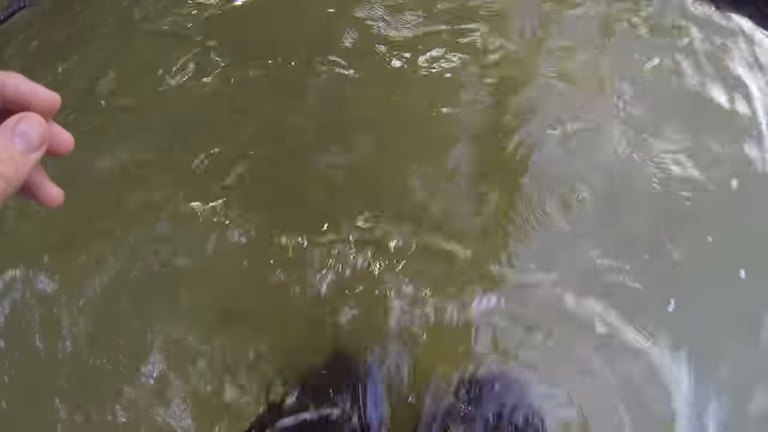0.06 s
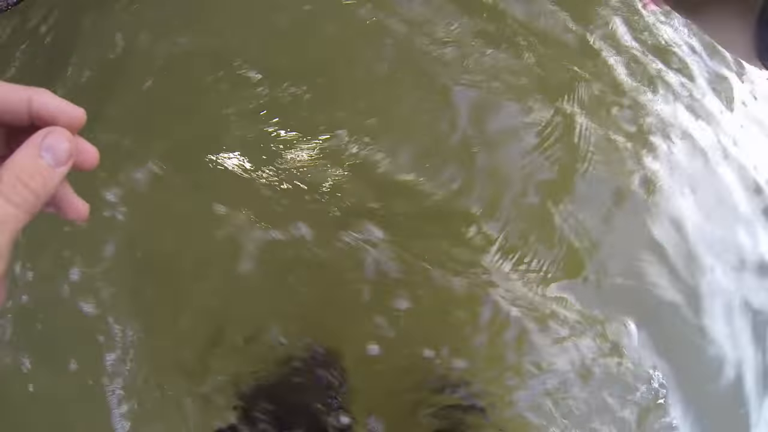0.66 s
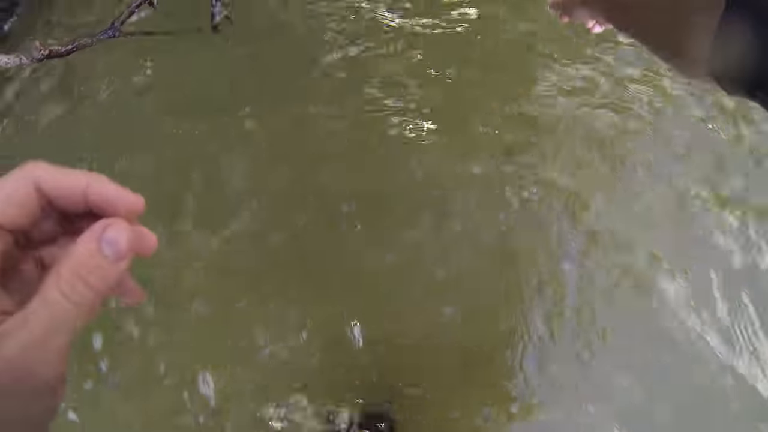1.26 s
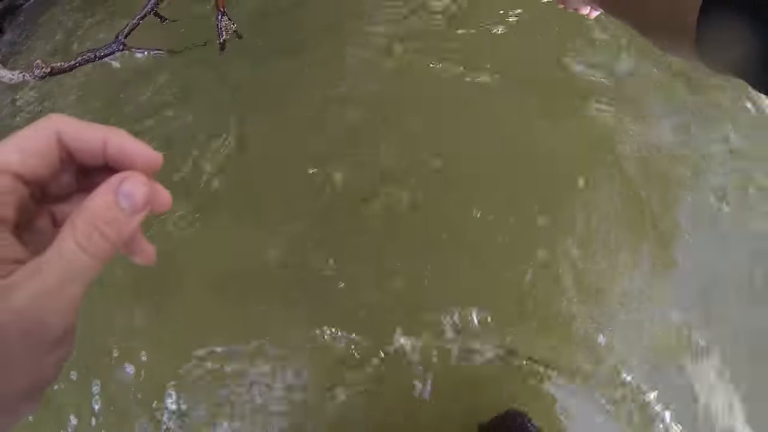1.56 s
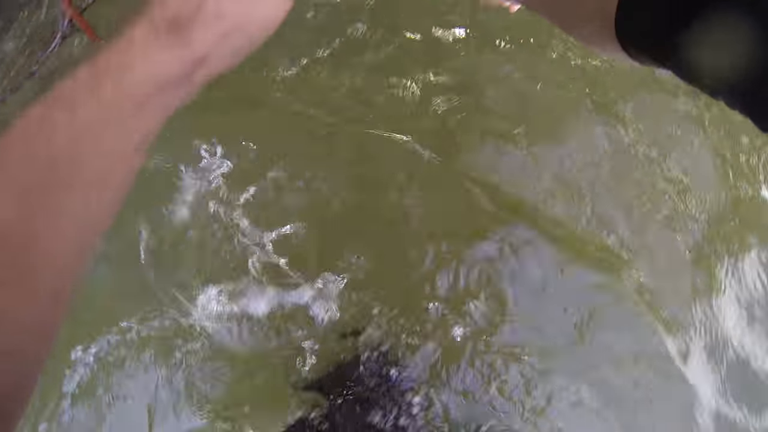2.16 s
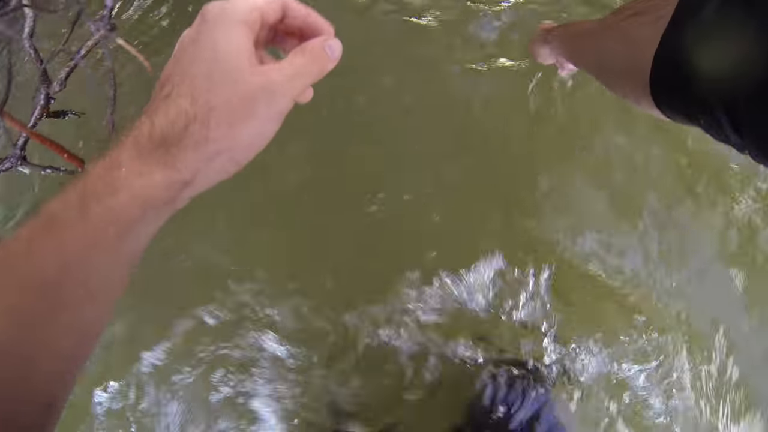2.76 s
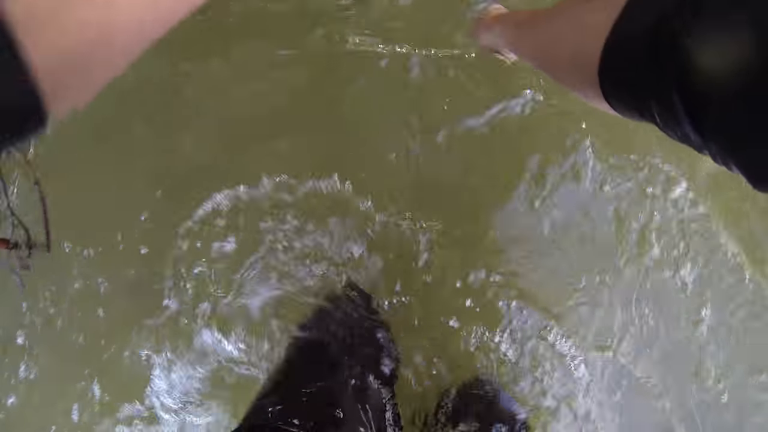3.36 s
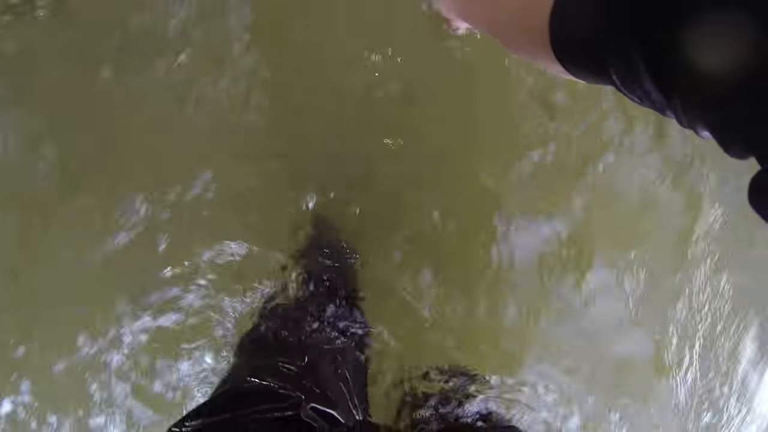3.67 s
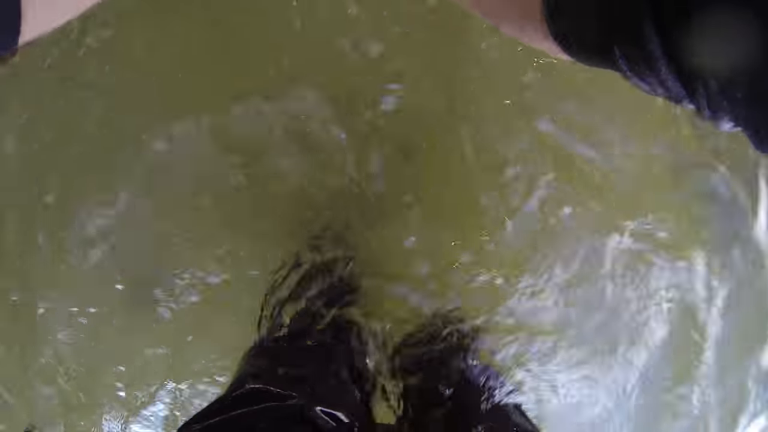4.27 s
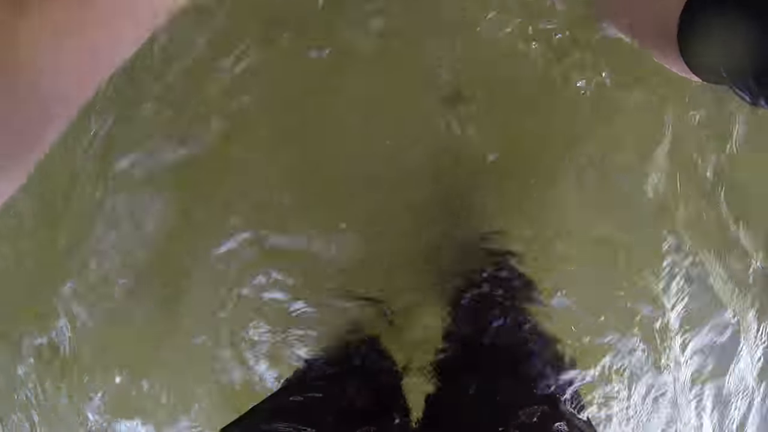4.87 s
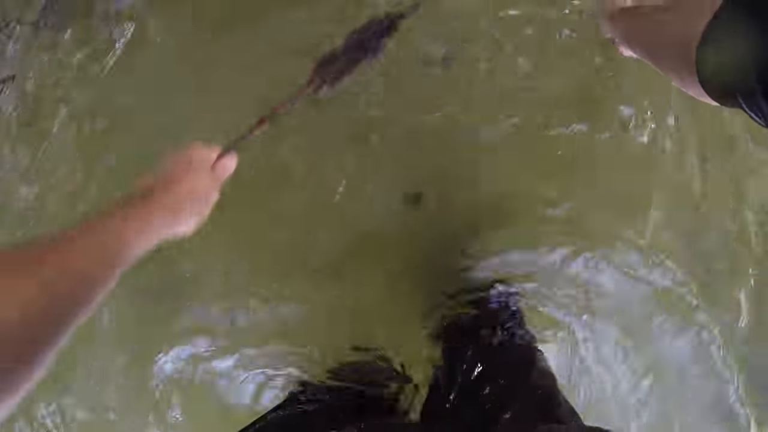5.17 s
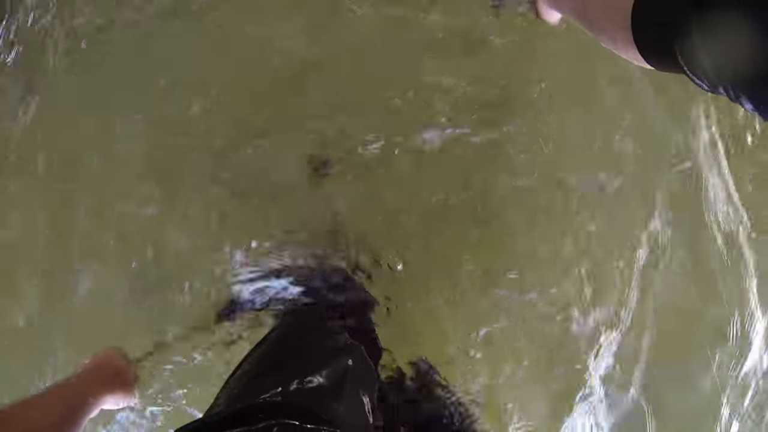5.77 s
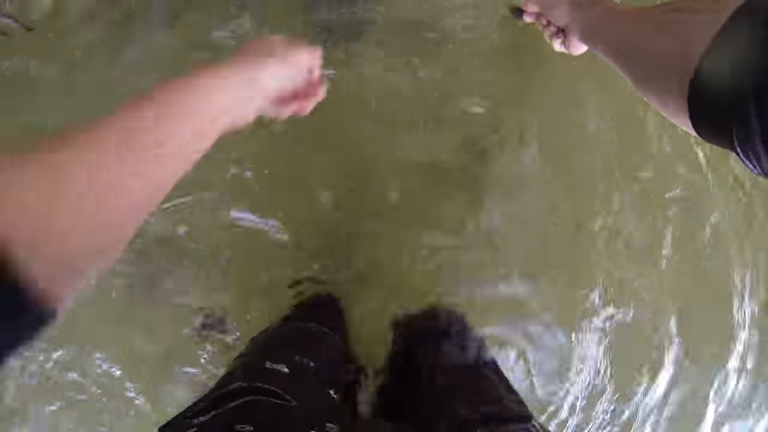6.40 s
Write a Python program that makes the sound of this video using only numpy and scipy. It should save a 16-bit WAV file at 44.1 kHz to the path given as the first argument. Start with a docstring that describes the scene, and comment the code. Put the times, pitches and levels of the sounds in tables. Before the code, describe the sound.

Someone wades through still, knee-deep water outdoors, heard close from chest height with almost no echo. From the start, uneven strides slosh and swish, each carrying bubbly gurgles and fine spray, with a sharp plop at about 0.7 seconds. After a brief lull the churning builds from 1.8 seconds, and at about 2.4 seconds a leg plunges in with the loudest splash and a deep, rising gulp, leaving faintly fizzing foam. Full, churning strides continue until about 4.4 seconds, dotted with ringing bubbles and crisp drops. The wading then turns gentler, with distinct plops and drips around 5 seconds. At about 6 seconds a stick falls back into the water with a light, bright splash and a small gulp, and one more stride sloshes at 6.6 seconds. Throughout, a soft low rumble of air and body movement buffets the microphone.

```python
"""Still water sloshes and churns as someone wades through it knee-deep, heard from chest height.
Each stride folds air into the water, which rings as swarms of bubbles, and throws up a fine spray.
One leg plunges in with a loud splash and a deep gulp, leaving fizzing foam; drips and single bubbles
follow, and a stick falls back into the water. Underneath, air and body movement buffet the microphone."""
import sys
import numpy as np
from scipy import signal
from scipy.fft import next_fast_len
from scipy.io import wavfile
from scipy.ndimage import uniform_filter1d

SR = 44100
rng = np.random.default_rng(int(sys.argv[2]) if len(sys.argv) > 2 else 0)


def digitize_waveform(pressure):
    """Quantize a signal to 16-bit integers and store it at the path in sys.argv[1].

    Rows of a 2-D input are taken as channels; values are limited to [-1, 1].
    """
    field = np.atleast_2d(pressure).T
    bounded = np.clip(field, -1, 1)
    quanta = np.round(bounded * 32767).astype(np.int16)
    wavfile.write(sys.argv[1], SR, quanta)


N = 292675
TIME = np.arange(N) / SR
TOP_HZ = 15800

# Surges pushed by the legs, before mix trims: peak_s, build_s, settle_s, churn_db, slosh_db, spray_db
LEG_SURGES = [(0.045, .07, .18, -54, -40, -42), (0.23, .12, .2, -42, -37, -45.5),
              (0.48, .3, .2, -45, -39, -43), (0.595, .14, .14, -33, -34, -42),
              (0.765, .3, .12, -38, -35, -50), (1.2, .39, .28, -48, -36, -41),
              (1.45, .25, .6, -45.5, -43, -47), (1.79, .26, .12, -38, -36, -41),
              (1.884, .15, .36, -36, -33, -42), (2.15, .14, .21, -34.5, -29, -34),
              (2.29, .28, .26, -31, -28, -36), (2.405, .13, .09, -25, -21, -29),
              (2.443, .04, .055, -38, -25, -27), (2.56, .25, .28, -35, -33, -43.5),
              (2.745, .2, .24, -33.5, -29, -35), (2.92, .2, .15, -33.5, -31, -40),
              (3.02, .1, .14, -48, -32.5, -43), (3.35, .26, .3, -31.5, -33, -40.5),
              (3.49, .2, .2, -46, -35, -41), (3.585, .1, .3, -34.5, -34, -45),
              (3.852, .24, .2, -34, -30, -37), (4.076, .3, .42, -41, -34.5, -43),
              (4.35, .1, .45, -45, -41, -46.5), (4.85, .45, .2, -43, -38, -43),
              (5.155, .3, .4, -52, -46, -46.5), (5.43, .2, .16, -53, -42, -47),
              (5.735, .1, .16, -50, -42, -44), (6.0, .55, .2, -48, -40, -41.5),
              (6.11, .15, .24, -50, -34, -41), (6.38, .3, .19, -45, -48, -42),
              (6.596, .09, .34, -43, -34, -39)]
# Quiet lapping between surges, before mix trims: churn_db, slosh_db, spray_db
LAPPING_FLOOR = (-50, -44, -54)
# Slow swell of the buffeting: time_s, relative_db
BUFFET_SWELL = [(0, -39.5), (1.5, -41), (1.8, -34.5), (2.1, -39), (3.0, -37.5), (3.3, -42), (4.45, -36.5),
                (4.65, -39), (5.2, -37), (5.6, -40.5), (6.6, -38)]
# Large or near bubbles: start_s, pitch_hz, level_db, t60_s, rise_ratio (share of pitch gained by t60_s)
NEAR_BUBBLES = [(0.0253, 1125, -23, .029, 0.082), (0.0376, 2133, -22, .013, 0.12),
                (0.0548, 1390, -24.5, 0.096, 0.65), (0.081, 1780, -13, 0.0048, .1),
                (0.1676, 820, -23.5, 0.024, 0.11), (0.6636, 623, -23, 0.12, .1),
                (0.6732, 715, -4.5, 0.012, .1), (0.7132, 500, -17.5, 0.033, 0.12),
                (0.8827, 960, -28, 0.048, 0.081), (0.9117, 2200, -23.5, .02, .1),
                (0.913, 1080, -23, 0.026, 0.98), (0.9806, 1056, -26.5, 0.095, 0.13),
                (1.5846, 1650, -26.5, 0.051, 0.29), (1.681, 1490, -27.5, .09, .4),
                (1.7136, 1560, -23, .052, 0.24), (1.7994, 1420, -13.5, 0.054, .5),
                (1.9112, 2260, -23, .022, .3), (2.1416, 413, -22, 0.22, 0.13),
                (2.1536, 1070, -18.5, .035, .1), (2.2294, 460, -15.5, 0.053, .3),
                (2.2535, 700, -18.5, 0.14, 0.18), (2.2588, 422, -14.5, 0.034, .3),
                (2.306, 730, -14, 0.042, .1), (2.3078, 310, -10.5, 0.038, .5),
                (2.3359, 963, -17.5, 0.078, 0.28), (2.3995, 760, -5.5, 0.019, 0.7),
                (2.4935, 624, -13, .018, .1), (2.6934, 1190, -19, .019, .1),
                (2.7402, 228, -18.5, 0.071, .1), (2.7403, 695, -16.5, .043, 0.38),
                (2.7966, 1370, -7.5, 0.012, .1), (2.8532, 1365, -14, .02, .1),
                (2.8886, 275.4, -25.5, .2, 0.074), (2.9182, 980, -22, .056, .1),
                (2.9299, 410, -18.5, 0.06, 0.76), (3.0082, 885, -19, 0.066, 0.81),
                (3.0162, 1376, -22, .045, 0.75), (3.264, 1240, -9, 0.011, .1),
                (3.3108, 974, -19.5, .053, .1), (3.388, 1360, -15.5, 0.01, .5),
                (3.4653, 1615, -20.5, .03, 0.11), (3.5713, 1790, -20, 0.023, .4),
                (3.6908, 1820, -24, 0.045, 0.96), (3.761, 400, -32.5, 0.34, 0.31),
                (3.8526, 2010, -8.5, 0.0077, .1), (3.8995, 860, -12.5, 0.024, .1),
                (3.97, 737, -22.5, 0.086, 0.55), (3.9868, 1060, -18.5, 0.079, 0.26),
                (3.9954, 1194, -21, 0.073, .2), (4.0317, 527, -24, .1, .05), (4.06, 1086, -21, .06, .1),
                (4.0661, 863, -18, .05, .05), (4.0681, 567, -21, 0.18, 0.95), (4.1251, 973, -20, 0.045, .4),
                (4.182, 1150, -25.5, 0.056, .1), (4.222, 1284, -28, 0.077, 0.47),
                (4.3088, 796, -17.5, .15, 0.69), (4.3525, 658, -20.5, 0.15, .08),
                (4.7878, 1584, -15.5, 0.052, .7), (4.788, 2510, -24.5, 0.025, .1),
                (4.8574, 564, -16, 0.11, 0.056), (5.0368, 776, -17, 0.15, .1),
                (5.0532, 1120, -25.5, 0.097, .1), (5.1376, 1320, -26, 0.056, .08),
                (5.7129, 754, -27.5, 0.069, 0.43), (5.7442, 3100, -27, .024, .1),
                (5.996, 1700, -20.5, 0.018, .1), (6.0383, 2120, -20.5, .019, .1),
                (6.0994, 831, -19.5, 0.081, 0.57), (6.269, 1710, -20.5, 0.014, 0.11)]
# Drops hitting the surface close by: start_s, centre_hz, level_db
NEAR_DROPS = [(0.071, 8130, -22), (0.5808, 7000, -17.5), (0.5967, 10700, -13), (0.8374, 13100, -28),
              (1.2361, 12800, -28), (2.0585, 6140, -16.5), (2.3448, 6230, -8.5), (2.402, 4500, -7.5),
              (2.4434, 6000, -24), (2.6861, 4340, -10), (2.7727, 8500, -17.5), (3.2343, 10000, -20.5),
              (3.6835, 5500, -16.5), (3.852, 5200, -7), (4.8346, 6400, -13), (4.8603, 6300, -20),
              (4.9458, 11900, -17), (5.054, 7000, -24.5), (5.143, 5240, -19.5), (5.1607, 6660, -26),
              (5.43, 6900, -19.5), (5.724, 6950, -16), (5.7578, 9900, -18), (5.8455, 5650, -18),
              (5.9599, 6100, -8.5), (6.0284, 4470, -14), (6.1408, 6900, -15.5), (6.4267, 5290, -19),
              (6.5804, 6180, -10.5)]
# Air pockets closing, one sweep each: the first behind the plunging leg, the second just after the stick falls:
# time_s, pitch_hz, level_db
GULP_SWEEPS = [
    [(2.346, 181, -12), (2.358, 217, -27), (2.366, 249, -7.5), (2.377, 360, -11), (2.383, 397, -11),
     (2.394, 540, -33)],
    [(6.079, 350, -37.5), (6.085, 425, -32.5), (6.094, 540, -33), (6.101, 736, -20), (6.110, 1000, -30)],
]
# Tone curves, one per layer: frequency_hz, relative_db
CHURN_EQ = [(110, -20.5), (180, 3), (250, -1), (380, 4.5), (500, 2), (700, -11)]
SLOSH_EQ = [(300, -21.5), (450, -8), (560, 1.5), (850, -1), (1150, -4), (1600, -7), (2200, -11.5),
            (3200, -16)]
SPRAY_EQ = [(1300, -20), (2300, -3), (3100, 1), (4400, 3), (5500, 2), (6800, 2.5), (8300, -3),
            (10500, -7.5), (13000, -5), (15500, -13)]
PATTER_EQ = [(3000, 8), (6500, 11.5), (10000, -10), (15000, -2)]
RUMBLE_EQ = [(2, 2), (6, -7.5), (16, -8.5), (24, -6), (35, -9.5), (60, -13), (100, -17), (140, -17.5),
             (185, -24), (300, -30.5), (600, -52)]
FOAM_EQ = [(6000, -27), (9300, 3), (13000, 0), (15500, -2)]
STICK_EQ = [(800, -11), (1150, 7), (2300, -2), (4000, 3), (6500, -20)]


def gain_of(db):
    """Decibels to amplitude."""
    return 10 ** (np.asarray(db) / 20)


def normalised(x):
    """Scales to rms 1."""
    return x / np.sqrt(np.mean(x ** 2) + 1e-20)


def levelled(x, window):
    """Rides the gain to hold rms near 1 over window samples."""
    power = uniform_filter1d(uniform_filter1d(x ** 2, window), window)
    return x / np.sqrt(abs(power) + 1e-12)


def equalised(x, curve):
    """Shapes the tone with a minimum-phase EQ; rms 1."""
    hz, db = np.transpose(curve)
    size = next_fast_len(N + 8192)
    bin_hz = abs(np.fft.fftfreq(size, 1 / SR))
    hz = np.r_[hz[0] / 2, hz, hz[-1] * 2]
    db = np.r_[db[0] - 30, db, db[-1] - 30]  # roll off past both ends
    shape_db = np.interp(np.log(bin_hz + 1), np.log(hz), db)
    response = np.exp(np.conj(signal.hilbert(np.log(gain_of(shape_db)))))
    return normalised(np.fft.ifft(np.fft.fft(x, size) * response).real[:N])


def add(mix, start_s, sound):
    """Lays a sound into the mix."""
    part = mix[max(round(start_s * SR), 0):][:len(sound)]
    part += sound[:len(part)]


def surges(range_db=20):
    """Level curves in dB for churn, slosh and spray: each surge builds and settles over the lapping."""
    power = gain_of(LAPPING_FLOOR)[:, None] ** 2 * np.ones(N)
    for peak_s, build_s, settle_s, *levels_db in LEG_SURGES:
        away = np.maximum((peak_s - TIME) / build_s, (TIME - peak_s) / settle_s)
        swell = gain_of(-range_db * np.minimum(away, 10))
        power += (gain_of(levels_db)[:, None] * swell) ** 2
    return 10 * np.log10(power)


def density(level_db, growth):
    """Harder stirring makes more bubbles: a factor on their birth rate, 1 on average."""
    rate = gain_of(growth * level_db)
    return rate / rate.mean()


def bubble(hz, t60_s, rise):
    """Trapped air rings and dies away; its pitch climbs as it nears the surface."""
    t = np.arange(int(t60_s * SR) + 8) / SR
    attack = 1 - np.exp(-3.7 * hz * t)
    envelope = attack * gain_of(-60 * t / t60_s)
    return envelope * np.sin(2 * np.pi * hz * t * (1 + rise * t / t60_s / 2))


def swarm(low_hz, high_hz, per_s, cycles, rise, spread_db, sizes):
    """Bubbles of many sizes, born at random, each ringing for roughly the given cycles; rms 1."""
    out = np.zeros(N)
    due = np.cumsum(per_s * np.ones(N)) / SR / sizes
    for hz, (life, climb) in zip(np.geomspace(low_hz, high_hz, sizes), rng.random((sizes, 2))):
        gap, accent, flip = rng.standard_exponential((3, 1500))
        at = np.searchsorted(due, np.cumsum(gap))
        polarity = np.sign(flip - np.log(2))
        strength = gain_of(spread_db * np.minimum(accent, 3.5)) * polarity
        births = np.bincount(at, strength, N + 1)[:N]
        ring = bubble(hz, cycles * (.5 + life) / hz, rise * climb)
        out += signal.oaconvolve(births, ring / np.linalg.norm(ring))[:N] * np.sqrt(hz)
    return normalised(out)


def stirred(bubbles, curve, level_db, foam_db, window, duck):
    """A swarm over smooth foam hiss swells with the stride; in lulls the bubbles duck into the hiss."""
    lull_db = np.minimum(level_db - np.percentile(level_db, 75), 0)
    water = bubbles * gain_of(duck * lull_db) + gain_of(foam_db) * rng.standard_normal(N)
    return levelled(equalised(water, curve), window) * gain_of(level_db)


def wading(churn_db, slosh_db, spray_db):
    """Large pockets churn below, middling bubbles slosh at the surface, tiny ones fizz in the spray."""
    large = swarm(201, 552, 220 * density(churn_db, 1.2), cycles=29.4, rise=.59, spread_db=3.5, sizes=14)
    mid = swarm(468, 2755, 650 * density(slosh_db, 1.3), cycles=56, rise=.86, spread_db=.5, sizes=60)
    tiny = swarm(2000, 14500, 2600 * density(spray_db, 1.3), cycles=30, rise=.4, spread_db=4.3, sizes=44)
    churn = stirred(large, CHURN_EQ, churn_db, foam_db=3.8, window=3000, duck=.22)
    slosh = stirred(mid, SLOSH_EQ, slosh_db, foam_db=-.064, window=2200, duck=.87)
    spray = stirred(tiny, SPRAY_EQ, spray_db, foam_db=-2, window=2600, duck=.35)
    return gain_of(-3.1) * churn + gain_of(.01) * slosh + spray


def lone_bubbles(swarm_db, per_s, centre_hz, octaves, cycles, rise, over_db, spread_db, follow=.55):
    """Single bubbles poke out of a swarm at random, more often and louder as it swells."""
    out = np.zeros(N)
    due = np.cumsum(per_s * density(swarm_db, 1)) / SR
    level_db = over_db + swarm_db.mean() + follow * (swarm_db - swarm_db.mean())
    for k, (late, life, climb, pitch, accent) in enumerate(rng.uniform(-1, 1, (1200, 5))):
        at = np.searchsorted(due, k + 2 + 2 * late)
        if at < N:
            hz = centre_hz * 2 ** (octaves * pitch)
            ring = bubble(hz, cycles * (1 + life / 2) / hz, rise * climb ** 2)
            add(out, at / SR, gain_of(level_db[at] + spread_db * accent) * ring)
    return out


def gurgle(slosh_db, spray_db):
    """Middling bubbles chirp out of the slosh; falling spray leaves tiny ones that crackle."""
    chirps = lone_bubbles(slosh_db, per_s=36, centre_hz=1401, octaves=1,
                          cycles=46.5, rise=.6, over_db=7, spread_db=2.5)
    crackle = lone_bubbles(spray_db, per_s=65, centre_hz=5400, octaves=.903,
                           cycles=27, rise=.35, over_db=13, spread_db=8.5)
    return chirps + crackle


def patter(spray_db, per_s=45, spread_db=7, trim_db=-9, decay_s=.0008):
    """Scattered fine drops tick brightly while spray is in the air."""
    strength = gain_of(spread_db * np.minimum(rng.standard_exponential(N), 2.5))
    hits = (rng.random(N) < per_s / SR) * strength
    t = np.arange(256) / SR
    burst = rng.standard_normal(len(t)) * np.exp(-t / decay_s)
    ticks = signal.oaconvolve(hits, burst)[:N]
    return equalised(ticks, PATTER_EQ) * gain_of(trim_db + spray_db)


def rumble(trim_db=5, gust_db=1.1, fastest_gust_hz=6.9):
    """Air and body movement buffet the microphone in slow, random gusts."""
    rates, phases = fastest_gust_hz * rng.random(12), rng.random(12)
    gusts = sum(np.sin(2 * np.pi * (hz * TIME + phase)) for hz, phase in zip(rates, phases))
    swell_db = np.interp(TIME, *np.transpose(BUFFET_SWELL))
    level_db = trim_db + swell_db + gust_db * normalised(gusts)
    return gain_of(level_db) * equalised(rng.standard_normal(N), RUMBLE_EQ)


def plops(wobble=.19):
    """Bubbles large or near enough to stand out; the moving surface makes their ring waver."""
    out = np.zeros(N)
    for start_s, hz, db, t60_s, rise in NEAR_BUBBLES:
        add(out, start_s, gain_of(db) * bubble(hz, t60_s, rise))
    flutter_band = signal.butter(3, [40, 130], "band", fs=SR, output="sos")
    surface = normalised(signal.sosfilt(flutter_band, rng.standard_normal(N)))
    return out * (1 + wobble * surface)


def drops(snap_t60_s=.0017, crack_t60_s=.0049, splatter_t60_s=.022, band_ratio=1.28):
    """A near drop snaps and cracks on the surface, then scatters into a short splatter."""
    out = np.zeros(N)
    t = np.arange(2048) / SR
    crack = gain_of(-9 - 60 * t / crack_t60_s)
    splatter = gain_of(-19 - 60 * t / splatter_t60_s)
    for start_s, hz, db in NEAR_DROPS:
        band = signal.butter(2, [hz / band_ratio, min(hz * band_ratio, TOP_HZ)], "band", fs=SR)
        noise = levelled(signal.lfilter(*band, rng.standard_normal(len(t))), window=64)
        add(out, start_s, gain_of(db) * bubble(hz, snap_t60_s, rise=0))
        add(out, start_s, gain_of(db) * (crack + splatter) * noise)
    return out


def gulps():
    """A closing air cavity shrinks, so its note sweeps upwards."""
    out = np.zeros(N)
    for sweep in GULP_SWEEPS:
        time_s, hz, db = np.transpose(sweep)
        t = np.arange(time_s[0], time_s[-1], 1 / SR)
        note = np.sin(2 * np.pi * np.cumsum(np.interp(t, time_s, hz)) / SR)
        envelope = gain_of(np.interp(t, time_s, db)) * signal.windows.tukey(len(t), .1)
        add(out, time_s[0], note * envelope)
    return out


def foam(start_s=2.45, build_s=.22, fade_db_per_s=1.5, level_db=-54.5):
    """The froth left by the plunge goes on fizzing as its finest bubbles burst."""
    fizz = swarm(7000, 16000, per_s=900, cycles=16, rise=.2, spread_db=3.5, sizes=12)
    age = np.maximum(TIME - start_s, 0)
    envelope = np.minimum(age / build_s, 1) * gain_of(level_db - fade_db_per_s * age)
    return equalised(fizz, FOAM_EQ) * envelope


def stick_splash(start_s=5.96, build_s=.036, t60_s=1.2, level_db=-38):
    """A wet stick falls back on the water with a light, bright splash of small bubbles."""
    beads = swarm(940, 5400, per_s=400, cycles=36, rise=.5, spread_db=-.5, sizes=30)
    age = np.maximum(TIME - start_s, 0)
    envelope = np.minimum(age / build_s, 1) * gain_of(level_db - 60 * age / t60_s)
    return levelled(equalised(beads, STICK_EQ), window=2600) * envelope


def with_reflections(x, wet_db=-15, t60_s=.02):
    """Adds faint, quick reflections from the body, the water and the bank."""
    t = np.arange(SR // 3) / SR
    taps = rng.standard_normal(len(t)) * (rng.random(len(t)) < .05)
    taps *= (t > .002) * gain_of(-60 * t / t60_s)  # pre-delay, then decay
    return x + gain_of(wet_db) * signal.oaconvolve(x, taps / np.linalg.norm(taps))[:N]


def scene():
    """Water and a faint hiss sit dead centre; the rumble leans slightly left."""
    churn_db, slosh_db, spray_db = surges()
    strides = wading(churn_db, slosh_db, spray_db) + gurgle(slosh_db, spray_db) + patter(spray_db)
    water = with_reflections(strides + drops() + plops() + gulps() + foam() + stick_splash())
    hiss = gain_of(-60) * rng.standard_normal(N)
    return water + hiss + rumble() * gain_of([[.35], [-.35]])


def record(dry):
    """Cuts the very top of the treble and adds a constant DC offset to each channel."""
    low_pass = signal.firwin(401, TOP_HZ, window=("kaiser", 9), fs=SR)
    dc_offset = np.array([[.2228], [.179]])
    return signal.oaconvolve(dry, low_pass[None], "same", axes=1) + dc_offset


dry = scene()
out = record(dry)
digitize_waveform(out)
```